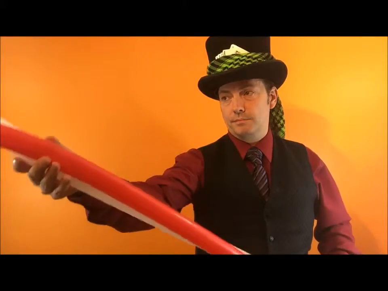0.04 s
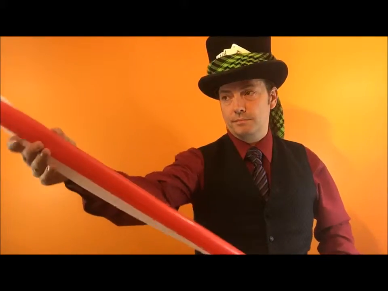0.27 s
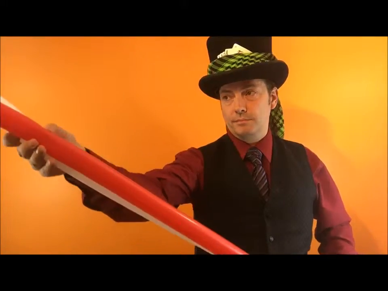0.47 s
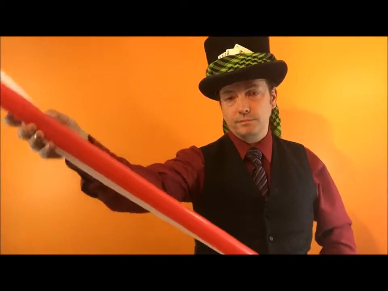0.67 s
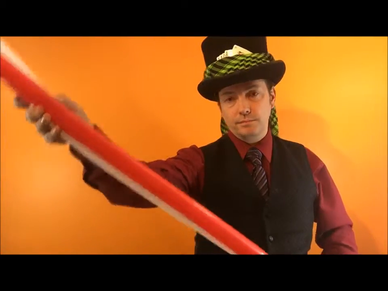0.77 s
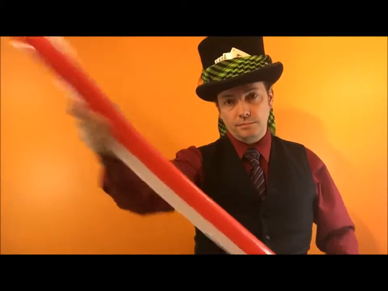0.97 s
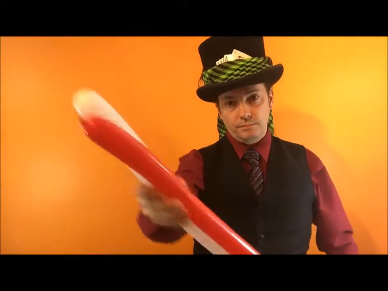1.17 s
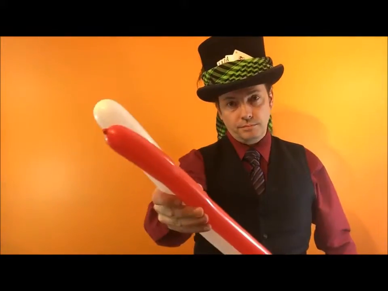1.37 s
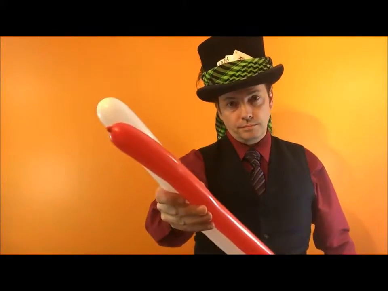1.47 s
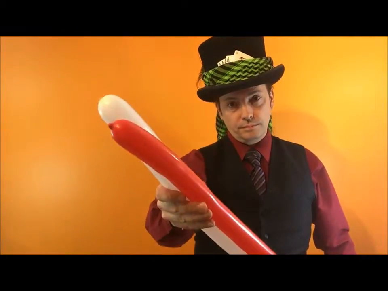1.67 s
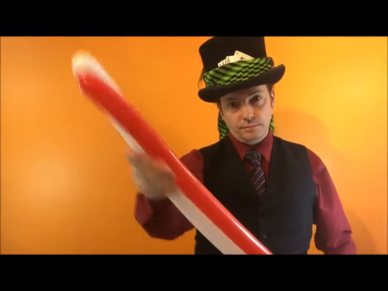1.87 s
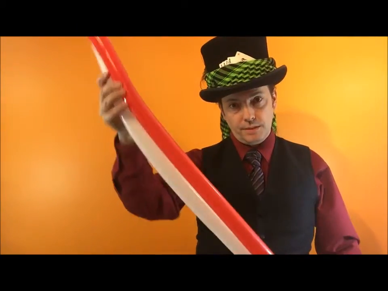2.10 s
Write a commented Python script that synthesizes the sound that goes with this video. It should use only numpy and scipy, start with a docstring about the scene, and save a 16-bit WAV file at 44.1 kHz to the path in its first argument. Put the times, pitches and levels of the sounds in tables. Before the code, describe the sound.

Hands rub and squeak along long inflated balloons, scratchy and snapping, then nearly quiet

```python
"""A small room, where hands slide along two long inflated latex balloons.
The skin sticks and lets go: big slips snap with short rings, a hollow note and treble ticks, and
nearly even slips creak. Runs of tiny slips scratch as coloured kicks and noise. The air column thuds
as low noise when gripped. The walls answer with fading noise, over a faint room hiss and hum."""
import sys
import numpy as np
from scipy import signal
from scipy.fft import rfft, irfft, next_fast_len
from scipy.io import wavfile
from scipy.ndimage import uniform_filter1d

SR = 44100
rng = np.random.default_rng(int(sys.argv[2]) if len(sys.argv) > 2 else 0)


def rack_gain(trim_db):
    """Turn a fader trim in dB into the linear factor to multiply a signal by."""
    fader = np.asarray(trim_db, float)
    return 10 ** (fader / 20)


def wav_out(sig):
    """Save sig, one row per channel (or a flat mono array), as 16-bit PCM at SR to the path in sys.argv[1]."""
    wavfile.write(sys.argv[1], SR, np.round(np.clip(np.atleast_2d(sig).T, -1, 1) * 32767).astype(np.int16))


N = 94329  # samples in the scene


def unit(x):
    """Scale to an rms (average strength) of 1."""
    return x / np.sqrt(np.mean(x ** 2) + 1e-20)


def along(points, hz):
    """Read a curve of (frequency [Hz], value) points, with frequency on a log axis."""
    f, value = np.transpose(points)
    return np.interp(np.log(hz + 1), np.log(f + 1), value)


def curves(rows):
    """Draw straight lines between rows: one value per sample for each column after the time."""
    s, *columns = np.transpose(rows)
    return [np.interp(np.arange(N) / SR, s, column) for column in columns]


def coloured(x, spectrum):
    """Filter x to the given spectrum; the filter is minimum phase, so it never sounds early."""
    m = 2 * next_fast_len(N // 2 + 4096)
    gain = rack_gain(along(spectrum, np.fft.rfftfreq(m, 1 / SR)))
    cepstrum = irfft(np.log(gain + 1e-6), m)
    # fold the backward half onto the forward half
    cepstrum[1:m // 2] *= 2
    cepstrum[m // 2 + 1:] = 0
    return irfft(rfft(x, m) * np.exp(rfft(cepstrum)), m)[:N]


# colour of the room hiss: (frequency [Hz], relative level [dB])
HISS_COLOUR = [(25, -14), (120, -3), (500, -7.5), (1070, -11.5), (3340, -16), (8000, -21), (16000, -29)]


def background():
    """Room hiss is steady coloured noise; mains hum is one steady sine."""
    hiss_rms_db, hum_hz, hum_peak_db = -69.5, 118.7, -77.5
    hiss = rack_gain(hiss_rms_db) * unit(coloured(rng.standard_normal(N), HISS_COLOUR))
    hum = rack_gain(hum_peak_db) * np.sin(2 * np.pi * hum_hz * np.arange(N) / SR)
    return hiss + hum


# colour of the treble: (frequency [Hz], relative level [dB])
TREBLE_COLOUR = [(3000, -37.5), (4900, 0), (5600, 3), (7600, 0.5), (10200, -13), (12500, -2), (15200, -9)]
# gain of the top of the treble: (time [s], level [dB])
TOP_GAIN = [(0, 3), (.55, -7), (1.25, -22), (1.38, 0.5), (2.14, 12)]


def treble(x):
    """Give x the treble colour, with the top of the treble on its own level curve."""
    split_hz = 11160
    x = unit(coloured(x, TREBLE_COLOUR))
    top = signal.sosfilt(signal.butter(4, split_hz, "high", fs=SR, output="sos"), x)
    low = signal.sosfilt(signal.butter(4, split_hz, "low", fs=SR, output="sos"), x)
    gain_db, = curves(TOP_GAIN)
    return low + rack_gain(gain_db) * top


def patchy(x):
    """Random louder and softer patches drift over time and pitch."""
    patch_db = 2.8  # rms spread of the patches
    z = signal.stft(x, nperseg=256)[2]
    field = uniform_filter1d(rng.standard_normal(z.shape), size=3, axis=0)  # smooth over pitch
    field = uniform_filter1d(field, size=8, axis=1)  # smooth over time
    patched = signal.istft(z * rack_gain(patch_db * unit(field)), nperseg=256)[1]
    return unit(patched[:N])


# how hard the hands rub: (time [s], skin level [dB], treble level [dB])
RUBBING = [(0, -48.5, -75), (.02, -62.5, -73), (.045, -47, -61.5), (.15, -52, -63.5), (.18, -42, -50.5),
           (.49, -39, -56), (.55, -49.5, -62), (.6, -44, -62.5), (.71, -47.5, -66.5), (.77, -55, -67),
           (.8, -44, -84), (.855, -52.5, -60), (.885, -59.5, -74.5), (1.03, -66, -72), (1.07, -57, -64.5),
           (1.11, -56, -70), (1.136, -44, -48.5), (1.23, -66, -73), (1.88, -96, -111), (1.895, -58, -75.5),
           (2, -64.5, -83), (2.1, -55, -77), (2.14, -53.5, -85)]
# the skin's voice: (frequency [Hz], relative level [dB])
SKIN_COLOUR = [(200, -55.5), (585, -14.5), (615, -12), (650, -24), (800, -20), (1050, -8), (1500, -13),
               (2000, -9), (3000, -15), (4000, -16), (4800, -29.5), (9000, -84.5)]


def scratch():
    """Tiny uneven slips over a smooth slide kick the skin and its treble."""
    median_gap_s, gap_scatter, size_spread_db = 1 / 900, .5, 3
    slide_db, treble_slide_db = -3, -9.5  # smooth noise relative to the kicks
    level_db, treble_db = curves(RUBBING)
    luck = rng.standard_normal((5000, 3))  # gap, size and direction of each slip
    slip_s = np.cumsum(np.exp(gap_scatter * luck[:, 0])) * median_gap_s
    at = (slip_s * SR).clip(0, N).astype(int)
    size = np.sign(luck[:, 2]) * rack_gain(size_spread_db * luck[:, 1])
    kicks = unit(np.bincount(at, size, N + 1)[:N])
    rub = kicks + rack_gain(slide_db) * rng.standard_normal(N)
    body = patchy(coloured(rub, SKIN_COLOUR))
    bright_rub = kicks + rack_gain(treble_slide_db) * rng.standard_normal(N)
    return rack_gain(level_db) * body + rack_gain(treble_db) * treble(bright_rub)


# the low handling thud: (time [s], level [dB])
THUD_LEVEL = [(.07, -66.5), (.12, -47), (.15, -62), (.18, -44.5), (.23, -51.5), (.34, -40.5), (.41, -51.5),
              (.45, -49.5), (.49, -61.5), (.94, -75), (.97, -62.5), (1.04, -78.5), (1.14, -48.5),
              (1.24, -86), (2, -71.5), (2.14, -59)]
# colour of the air column: (frequency [Hz], relative level [dB])
COLUMN_COLOUR = [(50, -16.5), (65, 2), (95, -8.5), (230, -11), (340, -6.5), (800, -34)]


def thud():
    """The air column under the grip rumbles: low noise that rises and falls."""
    level_db, = curves(THUD_LEVEL)
    return rack_gain(level_db) * unit(coloured(rng.standard_normal(N), COLUMN_COLOUR))


# how long the room rings: (frequency [Hz], time to fade by 60 dB [s])
ROOM_FADE = [(300, 0.094), (1300, 0.13), (10000, 0.097)]


def room(x):
    """The walls answer each 50 ms stretch with a fresh noise tail that fades at its own rate per pitch."""
    wet, hop, delay = np.zeros(N + SR), 2205, 200  # hop and delay in samples
    for a in range(0, N, hop):
        hz, t, z = signal.stft(rng.standard_normal(SR // 4), SR, nperseg=256)
        fade_s = along(ROOM_FADE, hz)[:, None].clip(.02)
        tail = signal.istft(z * rack_gain(-60 * t / fade_s), SR, nperseg=256)[1]
        part = signal.fftconvolve(x[a:a + hop], tail / np.linalg.norm(tail))
        wet[a + delay:][:len(part)] += part
    return wet[:N]


def grains(s, hz, cycles, size):
    """Add up short wave packets peaking at times s: a rounded swell, then a fall that starts more sharply."""
    k = np.arange(-64, 192)  # samples around each peak
    turn = hz[:, None] * k / SR
    life = turn / np.clip(cycles, .1, 3)[:, None]
    swell_and_fall = np.where(k < 0, np.exp(-life ** 2), 1 / np.cosh(2.5 * life))
    wave = size[:, None] * np.cos(2 * np.pi * turn) * swell_and_fall
    at = (s * SR).astype(int)[:, None] + k
    return np.bincount(at.ravel().clip(0), wave.ravel(), N + SR)[:N]


# band limit on the rings: (frequency [Hz], level [dB])
RING_LIMIT = [(300, -30), (850, 0), (4200, 0), (5200, -14)]


def skin_ring(s, hz, cycles, size):
    """Each slip rings the skin briefly, heard through a limited band."""
    return coloured(grains(s, hz, np.full(len(s), cycles), size), RING_LIMIT)


def hollow(s, size):
    """Kicks at times s ring the balloon's hollow note, a fading sine."""
    note_hz, fade_60db_s, note_db = 610, .07, -33
    t = np.arange(SR // 4) / SR
    note = rack_gain(note_db - 60 * t / fade_60db_s) * np.sin(2 * np.pi * note_hz * t)
    kicks = np.bincount((s * SR).astype(int), size, N)
    return signal.fftconvolve(kicks, note)[:N]


def ticks(s, size):
    """Each tick is a brief burst of treble noise that starts at once and dies away."""
    decay_s = .00045
    kicks = np.bincount((s * SR).astype(int), size, N)[:N]
    gate = signal.fftconvolve(kicks, np.exp(-np.arange(400) / SR / decay_s))[:N]
    return gate * treble(rng.standard_normal(N))


# big slips, before scatter and overall gains: (time [s], level [dB], pitch of the skin's ring [Hz],
# level of the side steps [dB], treble tick relative to the slip [dB])
BIG_SLIPS = [(0.0869, -29, 1800, 4, -14), (0.109, -29, 1970, -14, -13), (0.1151, -18, 1810, -5.5, -5),
             (0.1658, -21, 2740, 0, -13), (0.1718, -17, 2660, -16, -7), (0.1822, -26, 2230, 7, -4),
             (0.1900, -17, 2560, 2.5, -17), (0.2102, -18, 1830, -17, -2), (0.2484, -16, 1750, 1.5, -15),
             (0.2672, -16, 2170, 2, -8.5), (0.2986, -16.5, 2220, 4.5, -3.5), (0.3266, -16.5, 2560, 4, -6),
             (0.3657, -13.5, 2720, 1.5, -5.5), (0.4255, -16.5, 2540, 4.5, -13.5),
             (0.51, -18, 3050, -4.5, -3.5), (0.5766, -11, 2460, -3, -11), (0.8356, -27, 2820, 1, -17),
             (0.9488, -22.5, 2400, -3.5, -9.5), (1.0631, -20.5, 3000, -9.5, -14.5),
             (1.1154, -22, 2220, -1, 3), (1.1327, -18.5, 2350, -4.5, -6), (1.2814, -52, 1560, 0, -13),
             (1.3459, -48.5, 1830, 3, -23), (1.4075, -44, 1820, -1.5, -3), (1.4245, -45, 2370, 4, -2),
             (1.4497, -46.5, 1950, 7, -11), (1.4773, -37, 2050, 7, -12), (1.6061, -47.5, 2070, -7, -6),
             (1.7263, -43, 2240, -4.5, -5.5), (1.9104, -34.5, 1600, 2.5, -25),
             (1.9388, -40, 1540, 4.5, -16), (2.0432, -46.5, 1610, 4.5, -4.5), (2.0725, -45, 1670, 3, -22),
             (2.0815, -37.5, 3800, 1, -14), (2.0885, -45, 1510, 11.5, -8.5), (2.1015, -40, 3740, 3, -10),
             (2.1165, -31.5, 3930, -9, -10)]
# each big slip lets go in steps, before scatter: (delay [s], level [dB])
SLIP_STEPS = [(-.0024, -17), (-.0009, -8), (0, 0), (.0012, -7), (.0026, -7), (.0045, -11), (.0092, -12)]


def snaps():
    """Big slips let go in a few steps, each a short ring, a kick to the hollow body and a treble tick."""
    ring_cycles, pitch_spread, ring_db = .7, .22, -1
    tick_gain_db, tick_lead_s = -7.5, .0003
    s, db, hz, steps_db, tick_db = (np.repeat(c, len(SLIP_STEPS)) for c in np.transpose(BIG_SLIPS))
    late, step_db = np.tile(np.transpose(SLIP_STEPS), len(BIG_SLIPS))
    side = late != 0
    luck = rng.standard_normal((len(s), 4))  # delay, level, pitch and direction
    luck[:, :3] *= side[:, None]  # the main step keeps its time, level and pitch
    s = s + late * np.exp(.15 * luck[:, 0])
    db = db + step_db + steps_db * side + 2 * luck[:, 1]
    size = np.sign(luck[:, 3]) * rack_gain(db + ring_db)
    ring = skin_ring(s, hz * np.exp(pitch_spread * luck[:, 2]), ring_cycles, size)
    tick = ticks(s - tick_lead_s, rack_gain(db + tick_db + tick_gain_db))
    return ring + hollow(s, size) + tick


# a creak of nearly even slips: (time [s], level [dB], slips per second [1/s])
CREAK_SLIPS = [(.6, -38, 330), (.7, -34, 150), (.748, -46, 200), (.754, -28.5, 260), (.785, -29, 190),
               (.8, -30, 400), (.86, -37, 250), (.868, -70, 250), (2.03, -70, 250), (2.1, -42, 300)]


def creak():
    """Nearly regular small slips while a finger drags slowly, each with a ring, a hollow note and a tick."""
    gap_scatter, size_spread_db, tick_db = .1, 1.2, -23
    ring_hz, pitch_spread, ring_cycles = 2900, .12, .35
    level_db, rate = curves(CREAK_SLIPS)
    luck = rng.standard_normal((900, 3))  # gap, size, and pitch with the sign of the hollow note
    # a slip falls wherever the running count of slips passes the next uneven step
    slip_count = np.cumsum(np.exp(gap_scatter * luck[:, 0]))
    s = np.interp(slip_count, np.cumsum(rate) / SR, np.arange(N) / SR)
    sounding = (s > CREAK_SLIPS[0][0]) * (s < N / SR - .001)
    size = rack_gain(level_db[(s * SR).astype(int)] + size_spread_db * luck[:, 1]) * sounding
    ring = skin_ring(s, ring_hz * np.exp(pitch_spread * luck[:, 2]), ring_cycles, size)
    note = hollow(s, size * np.sign(luck[:, 2]))
    return ring + note + ticks(s, size * rack_gain(tick_db))


def scene():
    """Balloons, the walls' answer to their skin, the thud and the background, in one channel."""
    room_db = -9.5
    skin = snaps() + scratch() + creak()
    return (skin + rack_gain(room_db) * room(skin) + thud() + background())[None]


def roll_off(x):
    """The treble ends steeply here."""
    return signal.sosfilt(signal.butter(12, 16790, fs=SR, output="sos"), x)


def record(dry):
    """Limit the band: a gentle low cut and a sharp top edge."""
    low_cut_hz, top_hz = 43, 15800
    m = next_fast_len(N)
    hz = np.fft.rfftfreq(m, 1 / SR)
    band = (hz < top_hz) * hz ** 4 / (hz ** 4 + low_cut_hz ** 4)
    mix = irfft(rfft(dry, m) * band, m)[:, :N]
    return roll_off(mix)


dry = scene()
out = record(dry)
wav_out(out)
```